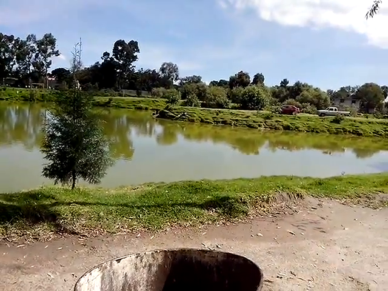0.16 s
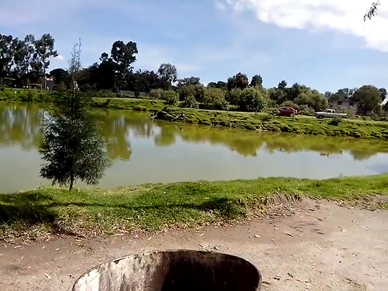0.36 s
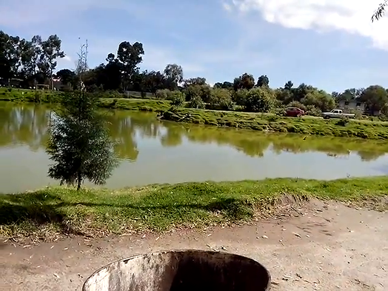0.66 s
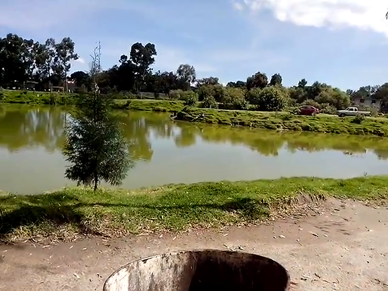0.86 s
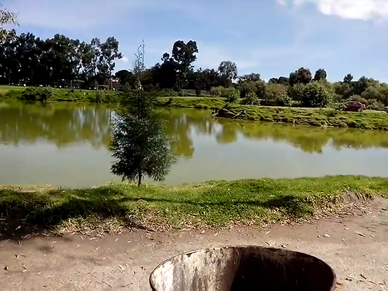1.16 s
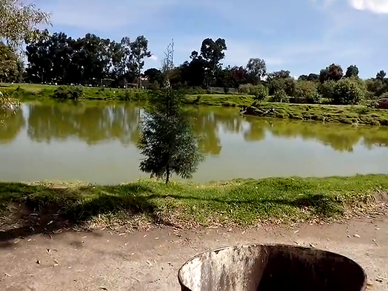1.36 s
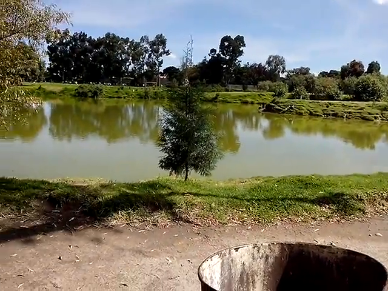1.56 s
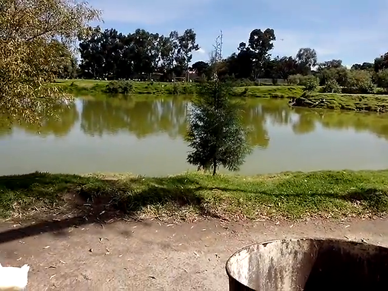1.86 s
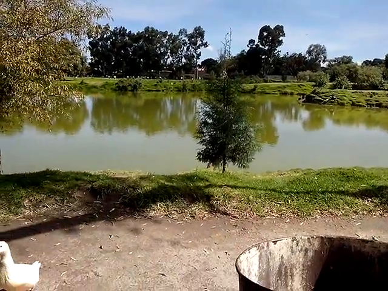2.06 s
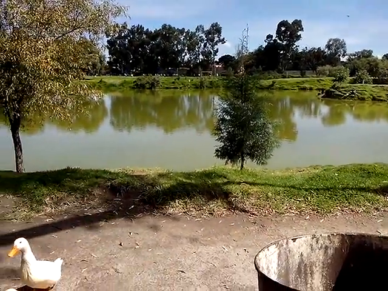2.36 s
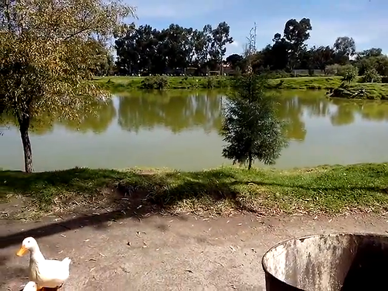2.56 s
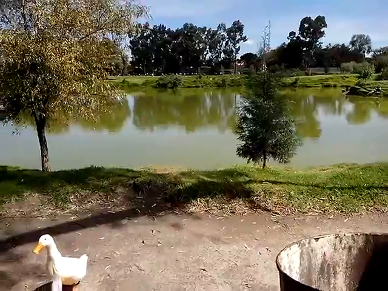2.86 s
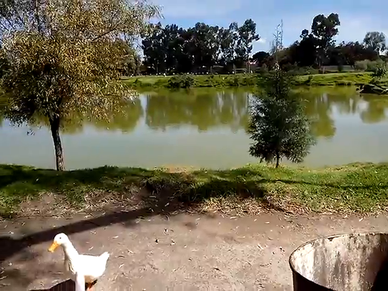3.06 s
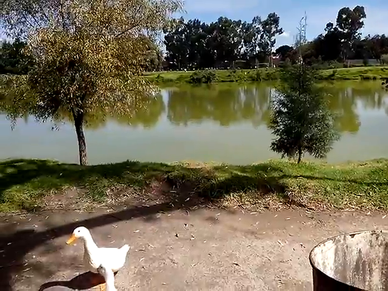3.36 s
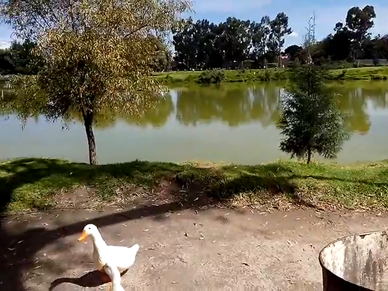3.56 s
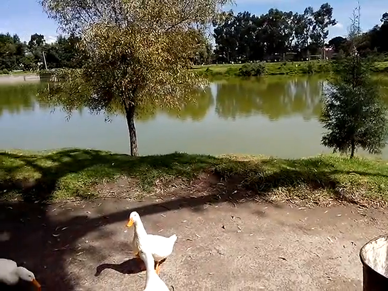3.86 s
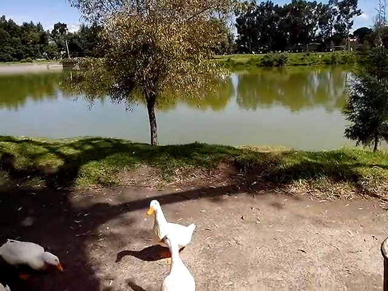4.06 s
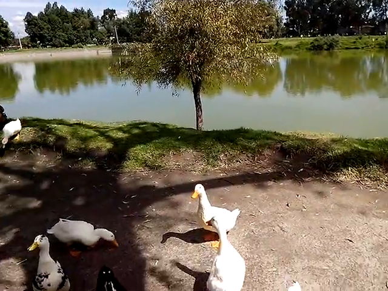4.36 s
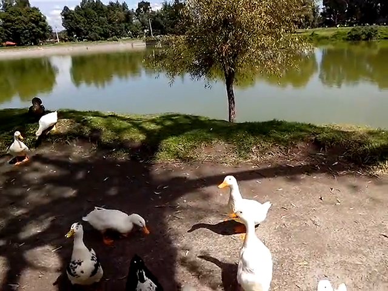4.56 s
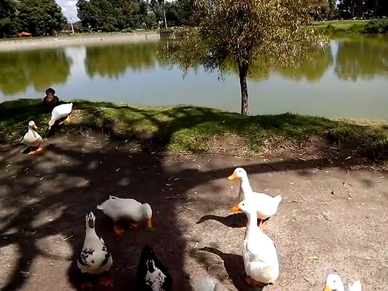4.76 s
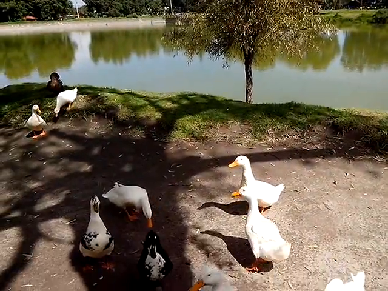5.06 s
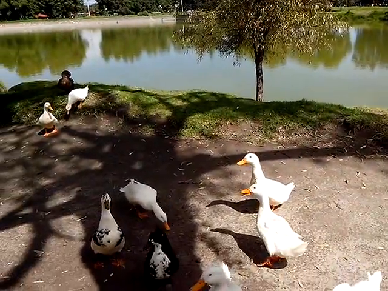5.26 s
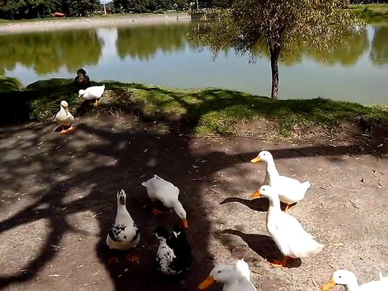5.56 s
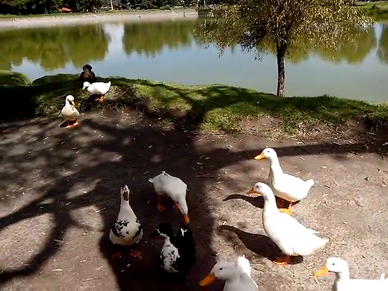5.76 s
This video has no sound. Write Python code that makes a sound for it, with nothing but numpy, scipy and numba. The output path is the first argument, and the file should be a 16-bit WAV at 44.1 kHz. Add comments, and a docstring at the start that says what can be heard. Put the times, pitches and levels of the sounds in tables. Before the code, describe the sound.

A flock of domestic ducks quacks and rasps in quick overlapping bursts outdoors, with brief squeals and a faint distant engine hum.

```python
"""Short pulsed quacks and hoarse, rattling rasps crowd together: a flock of domestic ducks calls on bare ground
beside a pond. Hens' quacks are membrane pulses filtered by throat and mouth resonances, with chest and treble
bands; drakes' rasps are noise modulated by a flapping membrane. Squeals are gliding partials with a second
membrane, clucks and booms are single swells of tone. The surroundings return faint diffuse tails as decaying
noise; a far engine hums as wavering sines and filtered noise, over shaped air noise."""
import sys
import numpy as np
from scipy import signal
from scipy.fft import rfft, irfft, next_fast_len
from scipy.io import wavfile
from scipy.ndimage import uniform_filter1d
from numba import njit

SR = 44100
rng = np.random.default_rng(int(sys.argv[2]) if len(sys.argv) > 2 else 0)


def wav_record(signal):
    """Record a signal, one row per channel, as 16-bit PCM in the file named by sys.argv[1]."""
    frames = np.transpose(np.atleast_2d(signal))
    bounded = np.clip(frames, -1, 1)
    # unit amplitude maps onto the largest positive 16-bit level
    quanta = np.round(bounded * 32767).astype(np.int16)
    wavfile.write(sys.argv[1], SR, quanta)


N = 260631
TIME = np.arange(N) / SR


def undb(db):
    """Logarithmic level: decibels become an amplitude ratio."""
    return 10 ** (np.asarray(db) / 20)


def noise(count):
    """White noise: independent Gaussian samples carry equal power at all frequencies."""
    return rng.standard_normal(count)


def curves(rows, t):
    """Linear interpolation: the columns of a table, joined by straight lines over its first column."""
    s, *columns = np.transpose(rows)
    return [np.interp(t, s, c) for c in columns]


def span(start, length):
    """Gating: times of a call, the share of it gone by, and a gate with edges of a few milliseconds."""
    margin = .01  # s
    t = TIME[(TIME > start - margin) & (TIME < start + length + margin)]
    to_nearest_end = np.minimum(t - start, start + length - t)
    gate = np.clip(to_nearest_end / 0.0025 + 1.1, 0, 1)
    return t, np.clip((t - start) / length, 0, 1), gate


def add(out, t, x):
    """Superposition: pressures sum, so x is mixed into out from time t[0] on."""
    i = int(round(t[0] * SR))
    out[i:i + len(x)] += x[:N - i]


def band(x, lo_hz, hi_hz):
    """Band limitation: a steep Butterworth band-pass."""
    return signal.sosfilt(signal.butter(4, [lo_hz, hi_hz], "band", fs=SR, output="sos"), x)


def colour(x, points):
    """Spectral shaping: each frequency is weighted by a (f/Hz, level/dB) curve, straight in log frequency."""
    size = next_fast_len(len(x), True)
    hz, db = np.transpose(points)
    f = np.maximum(np.arange(size // 2 + 1) * SR / size, 1)
    gain = undb(np.interp(np.log(f), np.log(hz), db))
    return irfft(rfft(x, size) * gain, size)[:len(x)]


def steady(x, size=900):
    """Normalisation by running power: the level is brought to one over size samples, single pulses kept."""
    power = uniform_filter1d(uniform_filter1d(x * x, size), size)
    return x / np.sqrt(np.abs(power) + 1e-18)


def wander(t, rate):
    """Random modulation: lines join Gaussian knots, rate per second, with a spread near one."""
    knots = np.arange(t[0], t[-1] + 2 / rate, 1 / rate)
    return np.interp(t, knots, noise(len(knots)))


def swept_phase(hz):
    """Phase is the time integral of frequency (rad)."""
    return 2 * np.pi * np.cumsum(hz) / SR


@njit
def resonate(x, hz, width):
    """Damped resonance: a state-variable band-pass whose centre may move every sample."""
    y, b, l = np.empty(len(x)), 0., 0.
    for i in range(len(x)):
        g, k = np.tan(np.pi * hz[i] / SR), width / hz[i]
        v = (b + g * (x[i] - l)) / (1 + g * (g + k))
        b, l, y[i] = 2 * v - b, l + 2 * g * v, k * v
    return y


def throat(t, source, resonances, drift, sag, arch=0):
    """Source-filter principle: parallel resonances drift singly, and arch and sink together over the call."""
    v = np.linspace(-1, 1, len(t))
    shape = 1 - sag * v + arch * (.25 - v ** 2)
    out = 0
    for hz, width_hz, db in resonances:
        gain = undb(db + 2 * wander(t, 45))  # each swells and sinks on its own
        centre_hz = hz * shape * (1 + drift * wander(t, 28))
        out = out + gain * resonate(source, centre_hz, float(width_hz))
    return out


def effort(t, attack, hold, release, start_db, end_db):
    """Driving pressure: the push of air, in dB re its peak, swells fast, rounds off, holds and gives out."""
    rising = np.clip(1 - t / attack, 0, 1)
    falling = np.clip((t - attack - hold) / release, 0, 1)
    return start_db * rising ** 1.3 + end_db * falling ** 1.05  # power 1 would be straight in dB


def syrinx(t, hz, jitter, shimmer_db, air, puff):
    """Self-oscillation: membranes snap shut unevenly once a cycle, each snap followed by turbulent air."""
    phase = np.cumsum(hz * (1 + jitter * wander(t, np.mean(hz)))) / SR
    cycle = phase.astype(int)
    since_snap = phase % 1 * SR / hz  # samples, near enough
    size = undb(shimmer_db * noise(cycle[-1] + 1)[cycle])
    # each snap is shared between two samples to place it between them
    snaps = np.diff(cycle + np.minimum(since_snap, 1), prepend=0)
    snaps = np.where(since_snap < 2, snaps, 0) * (cycle > 0)
    puffs = np.exp(-(phase % 1) / puff) * noise(len(t))
    return size * (snaps / snaps.std() + air * puffs / puffs.std())


def rattle(t, hz, jitter, depth):
    """Flow modulation: a slack membrane flaps, its rate and the force of the air wandering."""
    phase = np.cumsum(hz * (1 + jitter * wander(t, hz))) / SR + rng.random()
    flap = (.5 + .5 * np.cos(2 * np.pi * phase)) ** 2
    flow = (1 - depth + depth * flap) * undb(2 * wander(t, 107.2))
    return flow / np.sqrt(np.mean(flow ** 2))


def whistle(t, hz, first_db, second_db, membrane_hz, membrane_db):
    """Coupled oscillators: a tight syrinx gives a few hoarse partials and a second membrane at its own pitch."""
    # bill response to the fourth partial: f/Hz, level re second partial/dB, before weak calls lose more
    bill_response = [(3500, -28.5), (4600, -23), (5000, -1.5), (5400, -16)]
    phase = swept_phase(hz * (1 + .02 * wander(t, 500)))
    bill_db, = curves(bill_response, 4 * hz)
    fourth_db = bill_db + 1.7 * np.minimum(second_db + 35, 0)
    fifth_db = -20 + 1.5 * np.minimum(second_db + 28, 0)
    upper = np.sin(2 * phase)
    upper = upper + undb(-29) * np.sin(3 * phase + wander(t, 700))
    upper = upper + undb(fourth_db) * np.sin(4 * phase + .5 * wander(t, 600))
    upper = upper + undb(fifth_db) * np.sin(5 * phase + 2.5 * wander(t, 1200))
    membrane_phase = swept_phase(membrane_hz * (1 + .025 * wander(t, 400)))
    second_membrane = undb(membrane_db - 1 + 2 * wander(t, 90)) * np.sin(membrane_phase)
    tone = undb(first_db) * np.sin(phase) + undb(second_db) * upper + second_membrane
    hoarse = 1 + .33 * wander(t, 1100)
    return np.sqrt(2) * tone * hoarse * undb(2 * wander(t, 200))


def background():
    """Broadband and tonal noise: quiet air is shaped noise, a far engine is wavering orders and a rumble."""
    # spectrum of open air, its shape only: f/Hz, level/dB
    air_spectrum = [(25, -15), (60, -9.5), (120, -2.5), (200, -6.5), (320, -15.5), (700, -21), (1500, -27),
                    (3000, -29), (6500, -31), (8000, -24)]
    # engine orders: f/Hz, relative level/dB
    engine_orders = [(123.5, 8.5), (163, 5.5), (205, -5)]
    # swell of the engine: t/s, level/dB
    engine_swell = [(0, -69), (2.3, -68), (3.3, -68), (3.55, -65.5), (3.75, -58.5), (3.9, -59.5),
                    (4.2, -64.5), (5.2, -58.5), (5.9, -69)]
    air_db, rumble_db = -65, -6  # rumble re the swell
    air = colour(noise(N), air_spectrum)
    breeze = undb(1.8 * wander(TIME, 3) + 1.5 * wander(TIME, 11))
    swell_db, = curves(engine_swell, TIME)
    hum = 0
    for hz, db in engine_orders:
        gain = undb(db - 3.5 + 3.5 * wander(TIME, 14) + 2 * wander(TIME, 5))
        hum = hum + gain * np.sin(2 * np.pi * hz * TIME + wander(TIME, 14))
    rumble = band(noise(N), 80, 190)
    engine = undb(swell_db) * (hum + undb(rumble_db) * rumble / rumble.std())
    return air / air.std() * undb(air_db) * breeze + engine


def outdoors(x):
    """Diffuse scattering: rough ground smears each pulse; bank and trees add faint, exponentially dying tails."""
    t = TIME[:SR]
    out = x
    # ground, scatter, shore: level/dB and time to decay by 60 dB/s
    for db, t60 in (-7, 0.036), (-19, 0.24), (-38, 0.11):
        tail = noise(SR) * np.exp(-np.log(1000) * t / t60) * (t > .001)
        out = out + undb(db) * signal.fftconvolve(x, tail / np.linalg.norm(tail))[:N]
    return out


def clucks():
    """Harmonic synthesis: soft nasal notes of three partials and low booms of one, each swelling once."""
    # clucks: t/s, length/s, first f/Hz, last f/Hz, relative level/dB, third partial re first/dB
    cluck_rows = [(1.059, 0.062, 288, 380, -41.5, -21), (1.163, 0.064, 359, 450, -48.5, 5.5),
                  (1.359, .065, 271, 381, -43, -10), (4.702, 0.046, 723, 546, -61, -15),
                  (5.651, 0.068, 260, 343, -55.5, -40)]
    # low, short booms: t/s, length/s, f/Hz, relative level/dB
    boom_rows = [(4.238, 0.053, 120, -34.5), (4.295, 0.041, 132, -45), (4.368, 0.051, 120, -39),
                 (5.04, 0.075, 128, -45)]
    out = np.zeros(N)
    for start, length, first_hz, last_hz, db, third_db in cluck_rows:
        u = np.linspace(0, 1, int(length * SR))
        glide_hz = first_hz + (last_hz - first_hz) * u
        phase = swept_phase(glide_hz * (1 + 0.11 * wander(u * length, 350)))
        tone = np.sin(phase) + undb(-32.0) * np.sin(2 * phase) + undb(third_db) * np.sin(3 * phase)
        add(out, [start], undb(db) * np.sin(np.pi * u) ** 2 * tone * 2)
    for start, length, hz, db in boom_rows:
        u = np.linspace(0, 1, int(length * SR))
        phase = swept_phase(hz * (1 + .15 * (.5 - u) + 0.15 * wander(u * length, 150)))
        add(out, [start], undb(db) * np.sin(np.pi * u) ** 2 * np.sin(phase) * 2)
    return out


def squeak():
    """Frequency modulation: one thin, high tone and a lower companion waver in pitch and level."""
    start, length, hz, db = 0.895, .14, 4090, -46  # s, s, Hz, dB
    out = np.zeros(N)
    t, _, gate = span(start, length)
    phase = swept_phase(hz * (1 + .016 * wander(t, 500)))
    lower = undb(-5) * np.sin(0.63 * phase + .7 * wander(t, 200))
    add(out, t, gate * undb(db + 4 * wander(t, 150)) * (np.sin(phase) + lower))
    return out


def squeals():
    """Membrane tension sets pitch: short squeals glide, and one drawn-out squeal swells into a quack."""
    # short squeals: t/s, attack/s, release/s, first f/Hz, last f/Hz, bend of the glide (over 1 moves late),
    # first partial level/dB, second partial level/dB, second membrane relative level/dB
    squeal_rows = [(1.238, 0.017, 0.038, 920, 825, .7, -55, -79, -74),
                   (1.425, 0.026, 0.033, 1063, 820, 2.8, -46.5, -58, -62),
                   (1.658, 0.02, 0.024, 999, 754, 1.18, -48, -51, -58),
                   (2.127, .016, .018, 987, 768, 0.87, -44, -42, -58),
                   (2.359, 0.011, 0.0067, 1084, 910, 1.3, -50, -76, -70),
                   (2.64, 0.016, .05, 1085, 864, 0.49, -34, -30.5, -53),
                   (4.32, .012, 0.022, 1050, 1100, 1.1, -50.5, -61, -70),
                   (4.829, 0.022, 0.029, 1073, 685, 4, -36.5, -37, -38.5),
                   (5.215, 0.025, 0.036, 924, 817, 1.9, -52.5, -67, -66),
                   (5.672, .016, .025, 1210, 1086, 2, -80, -54, -76),
                   (5.715, 0.024, 0.0081, 1042, 940, 1.1, -83, -44, -74),
                   (5.751, 0.016, 0.038, 1246, 870, 0.83, -57, -53, -69),
                   (5.814, 0.017, 0.024, 1068, 890, 2.6, -43, -70, -40.5),
                   (5.849, 0.017, 0.015, 836, 714, 0.86, -43.5, -59, -60)]
    # long squeal: t/s, f/Hz, first partial level/dB, second partial level/dB,
    # second membrane f/Hz, second membrane relative level/dB
    wail = [(4.06, 1336, -68, -60, 2250, -53.5), (4.087, 1180, -51, -41, 1800, -54),
            (4.121, 1243, -51.5, -43.5, 1930, -38), (4.191, 1263, -42, -34, 2100, -40),
            (4.219, 1164, -34, -24, 1990, -32), (4.235, 1028, -43, -26, 1900, -34)]
    edge_db, membrane_ratio = -12.5, 1.7  # level at both ends re peak; second membrane's pitch re the first
    out = np.zeros(N)
    for start, attack, release, first_hz, last_hz, bend, first_db, second_db, membrane_db in squeal_rows:
        t, u, gate = span(start, attack + release)
        push_db = effort(t - start, attack, 0, release, edge_db, edge_db)
        hz = first_hz + (last_hz - first_hz) * u ** bend
        tone = whistle(t, hz, first_db + push_db, second_db + push_db,
                       membrane_ratio * hz, membrane_db + push_db)
        add(out, t, gate * tone)
    t, _, gate = span(wail[0][0], wail[-1][0] - wail[0][0])
    add(out, t, gate * whistle(t, *curves(wail, t)))
    return out


def drakes():
    """Modulated turbulence: flaps of hoarse air ring throat, mouth and bill, which slide together, under a hiss."""
    # rasps: t/s, attack/s, hold/s, release/s, level/dB, hiss re level just past the end/dB,
    # hiss gain over the call/dB, mouth f/Hz, its slide over the call/Hz, throat f/Hz,
    # throat re mouth/dB, bill re mouth/dB (both at 0.4 of the call), hiss f/Hz, hiss spread/Hz
    rasp_rows = [(-.019, 0.017, 0.065, 0.043, -43, 5.5, 29.5, 1700, -100, 1394, 6, -3, 5300, 905),
                 (0.224, 0.041, 0.02, 0.14, -40, -22, -5.5, 1730, -100, 1350, -10, -18, 5000, 400),
                 (0.462, 0.041, 0.0073, 0.044, -36, -6, 11.5, 1820, 48, 1550, -10, -26, 4910, 700),
                 (0.628, 0.022, 0.039, 0.015, -32, -7.5, 27.5, 2040, 104.5, 1540, -8, -12, 4900, 600),
                 (.845, 0.026, 0.026, 0.032, -36, -3.5, 5.5, 1770, 150, 1405, -9.5, -26, 5040, 1000),
                 (.932, 0.062, 0.0083, 0.02, -42.5, 6.5, 18.5, 2240, 55, 1440, -5, -1, 4950, 704),
                 (1.002, 0.061, 0.037, 0.063, -33, 4, 10, 1800, 353, 1557, -11.5, -6, 4730, 1620),
                 (1.138, 0.049, 0.0037, 0.05, -39.5, -5.5, -12, 1974, -250, 1360, -26, -9, 5930, 1000),
                 (1.289, 0.025, 0.025, 0.06, -32.5, 5, 25, 2010, 102, 1440, -0.5, -1, 4950, 351),
                 (1.399, 0.0094, .062, 0.043, -42.5, -16.5, -22.5, 2065, -100, 1440, -13, -7, 5840, 997),
                 (1.521, 0.0094, 0.056, 0.041, -29.5, 2.5, 26.5, 1950, -200, 1330, -10.5, -5, 4800, 700),
                 (1.765, 0.014, 0.049, 0.02, -33, -9, 20.5, 1940, -200, 1310, -5.5, -1, 4780, 450),
                 (1.876, 0.015, 0.03, 0.027, -43.5, -26, 1, 2370, 201, 1400, -14, 11.5, 4300, 800),
                 (1.935, 0.014, 0.032, .039, -34.5, -1, 23, 1780, 50, 1480, -21.5, -13, 4200, 600),
                 (2.155, 0.028, 0.019, 0.066, -29.5, -9, 7, 1926, -85, 1330, -5, -17, 4190, 810),
                 (2.439, 0.014, 0.042, 0.037, -38, -37, -2, 2010, 53, 1380, -7, -21.5, 4970, 1190),
                 (2.516, 0.043, 0.017, 0.12, -38, 23.5, 53.5, 1960, 150, 1566, -5, -2, 4700, 1000),
                 (2.828, 0.054, 0.043, 0.058, -45.5, 5.5, 6.5, 2124, 98, 1460, -11.5, -5.5, 5770, 1200),
                 (3.176, 0.02, 0.047, 0.038, -43.5, -8.5, 10.5, 1914, -200, 1426, -1, 3, 5220, 400),
                 (3.401, 0.024, 0.024, 0.093, -32, 0.5, 17, 1900, -55, 1444, -10.5, -11.5, 5020, 300),
                 (3.625, 0.038, 0.047, 0.06, -35, -2, 4, 1940, -45, 1443, -4, -8, 5860, 1310),
                 (3.888, 0.031, 0.07, 0.062, -35, -24, -19, 1920, -59, 1398, -7.5, -24, 5880, 1200),
                 (4.289, .01, .002, 0.031, -41.5, -7, 20, 2000, -45, 1450, -14.5, -12, 5600, 902),
                 (4.518, 0.033, 0.066, .05, -38.5, -33, -23.5, 1963, -480, 1474, -7, -15.5, 5130, 505),
                 (4.754, 0.031, 0.025, 0.032, -42.5, 0.5, 10, 2150, -100, 1550, -2.5, 6.5, 4460, 700),
                 (4.878, 0.016, .034, 0.14, -59, -30.5, 6, 2180, -300, 1480, -11, -6, 4360, 1000),
                 (5.173, 0.036, 0.03, .023, -51.5, -24, -3, 2110, -200, 1500, -20, -14, 5200, 1200),
                 (5.248, 0.034, 0.025, 0.05, -37.5, -31, 16, 2005, -46, 1580, 5.5, -4.5, 5500, 900),
                 (5.392, 0.031, 0.025, .045, -43.5, -12, 13.5, 2060, 54, 1580, 5.5, -0.5, 5250, 500),
                 (5.48, 0.016, 0.058, 0.045, -36, -20.5, 12.5, 1960, -100, 1650, 0.5, -8.5, 5680, 1220)]
    start_db, end_db = -22.5, -26  # effort at both ends re peak
    flap_hz, rush_db = 78, -26  # rush: even noise under the hiss resonances
    dulling_db = 6  # the bill loses this over the call, the throat gains half of it
    out = np.zeros(N)
    for (start, attack, hold, release, peak_db, hiss_db, hiss_growth_db, mouth_hz, slide_hz,
         throat_hz, throat_db, bill_db, hiss_hz, hiss_width_hz) in rasp_rows:
        t, u, gate = span(start, attack + hold + release)
        db = peak_db + effort(t - start, attack, hold, release, start_db, end_db)
        flow = rattle(t, flap_hz, jitter=.2, depth=.68)
        dulled_db = dulling_db * (u - .4)
        tract = [(throat_hz, 120, throat_db + dulled_db / 2),
                 (mouth_hz, 130, 0),
                 (2450, 95, bill_db - dulled_db)]
        mouth = 0
        for resonance in tract:  # each is driven by its own turbulence
            turbulence = flow * noise(len(t))
            mouth = mouth + throat(t, turbulence, [resonance], drift=.025,
                                   sag=-slide_hz / mouth_hz / 2, arch=.04)
        mouth = steady(band(mouth, 1265, 3200), size=300) * flow ** 0.53  # flaps restored after levelling
        mouth = steady(band(mouth, 1130, 2750))
        rush = (flow + 1.4) * noise(len(t))
        peaks = [(hiss_hz - .4 * hiss_width_hz, 200, -5), (hiss_hz, 200, 0),
                 (hiss_hz + .4 * hiss_width_hz, 200, -5), (3900, 150, -13)]
        hiss = undb(rush_db) * rush + throat(t, rush, peaks, drift=.015, sag=.01, arch=.02)
        hiss = steady(band(hiss, 3400, 7000))
        hiss_gain = undb(hiss_db + hiss_growth_db * (u - 1.09))
        add(out, t, gate * undb(db) * (mouth + hiss_gain * hiss))
    return out


def hens():
    """Pulse excitation of sliding resonances: ragged pulses ring the tract; a held call settles into a buzz."""
    # quacks: t/s, attack/s, hold/s, release/s, level/dB, treble re level/dB, treble gain over the call/dB,
    # treble f/Hz, chest re level/dB, chest f/Hz, throat f/Hz, throat re mouth/dB, mouth f/Hz,
    # mouth width/Hz, side f/Hz, side re mouth/dB, sinking of these either side of mid-call/share, pitch f/Hz
    quack_rows = [(0.133, 0.0035, 0.025, 0.019, -36, -36.5, -8, 4800, -21.5, 230, 1000, 4, 1230, 161, 1800, -18.5, 0.13, 250),
                  (0.271, 0.02, 0.016, 0.026, -36, -27.5, 26, 5100, -12, 260, 1030, 1, 1230, 200, 1800, -4.5, .1, 234),
                  (.338, 0.012, 0.036, 0.036, -29.5, -28.5, 29, 5000, -16, 260, 1134, -7.5, 1380, 180, 1720, -8, -0.09, 228.7),
                  (.519, .015, .022, .016, -24, -14, 1.5, 4070, -13, 248, 1100, -16.5, 1350, 200, 1740, -1, -0.076, 220),
                  (.568, .02, 0.0086, 0.048, -28, -13.5, 4, 4400, -11, 227, 1053, -11, 1480, 128, 2140, -6, 0.024, 178.4),
                  (0.694, .004, 0.023, 0.025, -26, -12.5, 5, 4170, -18, 200, 1015, -17, 1380, 200, 1780, -2.5, 0.045, 145.3),
                  (.727, .015, 0.014, 0.036, -24, -11, 18, 4520, -9, 232, 1040, -2.5, 2000, 418, 1465, 6.5, 0.00054, 257.6),
                  (.82, 0.0022, 0.018, .036, -25.5, -26, 28, 4930, -19, 180, 990, -8.5, 1354, 218, 1670, -13, -0.019, 183.8),
                  (0.968, 0.015, 0.007, .052, -27, -21.5, 14, 4900, -7, 274, 1040, -5, 1440, 260, 1850, -22, -0.044, 215),
                  (1.359, .019, 0.0087, 0.054, -26.5, -10.5, 7.5, 4520, -20.5, 316, 1154, -11.5, 1786, 200, 2026, -0.5, 0.11, 216.3),
                  (1.588, .014, 0.015, 0.044, -30, -8, 6, 3990, -8, 218, 1053, -17.5, 1800, 280, 1454, -1.5, 0.051, 200),
                  (1.838, .023, 0.0072, 0.031, -28.5, -20.5, 8, 3900, -10.5, 240, 1020, -8.5, 1860, 261, 1330, -10, .03, 210.4),
                  (2.056, .019, 0.0056, 0.023, -22.5, -14.5, 30, 3600, -15.5, 289, 1000, -15, 1885, 169.4, 2255, -10.5, 0.034, 269.8),
                  (2.102, .044, 0.016, 0.018, -34, -12.5, -23, 3900, -6, 400, 893, -7, 1330, 154, 1860, 6, 0.042, 198.2),
                  (2.552, 0.0081, 0.033, 0.057, -42.5, -14, 3.5, 4450, -17, 233, 1000, -10.5, 1750, 251, 1242, -4.5, 0, 199.2),
                  (2.67, .017, .13, .047, -21.5, -9, 1.5, 5730, -19, 247, 938, -9.5, 1840, 187.3, 1672, -12, .005, 239.9),
                  (4.229, 0.0089, 0.0098, 0.035, -25.5, -11.5, 2, 5020, -10.5, 153, 1475, -1.5, 1940, 223, 2140, -10.5, 0.0086, 240.6),
                  (4.358, 0.014, 0.0043, 0.044, -31.5, -22.5, 20, 5150, -4.5, 141.5, 1500, -5, 2003, 290, 2305, -7.5, 0.069, 199.6),
                  (4.802, 0.019, 0.057, 0.036, -38.5, -22.5, -5, 3970, -16.5, 180, 850, -3.5, 1510, 244, 2110, -5.5, -0.036, 180.5),
                  (4.993, .025, 0.014, .036, -19, -11, 13, 5400, -14.5, 227, 896, -4.5, 1412, 217, 1640, -5, -0.02, 243.5),
                  (5.645, 0.0073, 0.014, 0.024, -49, -31, 23.5, 5000, 3.5, 274, 1455, -7, 1860, 140, 2340, -7.5, -0.012, 173.6),
                  (5.784, 0.011, 0.011, 0.052, -43, -35, 6, 5400, -8.5, 200, 920, 1.5, 1600, 160, 1810, -24, -0.041, 165),
                  (5.866, 0.021, 0.0098, 0.021, -52.5, -18, 0, 5200, -2.5, 228, 1030, 2, 1480, 300, 1850, -18, 0.0091, 156.3)]
    # narrow throat and bill resonances: f/Hz, width/Hz, relative level/dB
    narrow = [(271, 25, -8.5), (477, 260, -10.5), (1030, 400, -1), (1230, 120, -2), (1410, 48, -1),
              (1750, 40, -1.5), (1730, 29, 0.5), (2600, 860, -5), (3620, 240, -0.5), (4000, 34, -24),
              (5000, 43, -13), (4800, 72, -23.5), (6240, 83, -14), (6660, 1100, -9.5)]
    start_db, end_db = -16, -24.5  # effort at both ends re peak
    octaves_per_db, arch_octaves, waver_octaves = .015, .13, .02  # pitch: with effort, mid-call rise, drift
    settle_s = .045  # time to settle into a regular buzz, and to break up again before the fade
    narrow_db, chest_growth_db = -19, 15.5  # narrow resonances in the voice; chest gain over the call
    out = np.zeros(N)
    for (start, attack, hold, release, peak_db, treble_db, treble_growth_db, bill_hz, chest_db, chest_hz,
         throat_hz, throat_db, mouth_hz, mouth_width_hz, side_hz, side_db, sag, pitch_hz) in quack_rows:
        length = attack + hold + release
        t, u, gate = span(start, length)
        push_db = effort(t - start, attack, hold, release, start_db, end_db)
        arch = arch_octaves * (2 * u - 1) ** 2
        hz = pitch_hz * 2 ** (octaves_per_db * push_db - arch + waver_octaves * wander(t, 35))
        late = u - (attack + hold / 2) / length  # zero in the middle of the hold
        to_edge = np.minimum(t - start, start + attack + hold - t)
        slack = 1 - np.clip(to_edge / settle_s, 0, 1)  # 1 = ragged, 0 = regular
        source = syrinx(t, hz, jitter=.021 + .11 * slack, shimmer_db=1.7 + 1.7 * slack,
                        air=.36 - .14 * slack, puff=.2)

        tract = [(throat_hz, 140, throat_db), (mouth_hz, mouth_width_hz, 0), (side_hz, 57, side_db)]
        voice = throat(t, source, tract, drift=.012 + .015 * slack, sag=sag, arch=.04)
        voice = voice + undb(narrow_db) * throat(t, source, narrow, drift=.04, sag=sag)
        mouth = steady(band(voice, 772, 2510), size=600)
        full = steady(band(np.tanh(.25 * mouth), 600, 2900))  # soft clipping of the peaks

        # treble: pulsed turbulence rings the bill
        pulsed = np.tanh(source / 8) * (4 + 2.5 * noise(len(t))) + .4 * noise(len(t))
        turbulence = throat(t, pulsed, narrow, drift=.04, sag=.005)
        ring = resonate(turbulence, np.full(len(t), float(bill_hz)), 900.) / .5
        treble = steady(band(.5 * turbulence + ring, 3500, 6800))
        treble = undb(treble_db + treble_growth_db * late) * treble

        # the chest comes late and outlasts the mouth tone
        airy = source + (.3 + .6 * slack) * noise(len(t))
        body = band(airy, .68 * chest_hz, 1.35 * chest_hz)
        body = body + .22 * band(airy, 330, 510) + .5 * band(airy, 70, 130)
        chest = undb(chest_db + chest_growth_db * (u - .42)) * steady(body, size=500)
        add(out, t, gate * undb(peak_db + push_db) * (full + treble + chest))
    return out


def scene():
    """Superposition at one point: calls with their scattered tails, plus background, alike in both channels."""
    calls = hens() + drakes() + squeals() + squeak() + clucks()
    mono = outdoors(calls) + background()
    return np.array([mono, mono])


def record(dry):
    """Band limitation: a steep elliptic low-pass removes the sound above 7100 Hz."""
    return signal.sosfilt(signal.ellip(8, .3, 70, 7100, fs=SR, output="sos"), dry)


dry = scene()
out = record(dry)
wav_record(out)
```